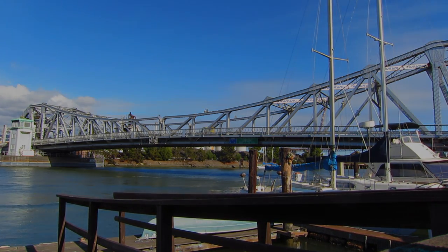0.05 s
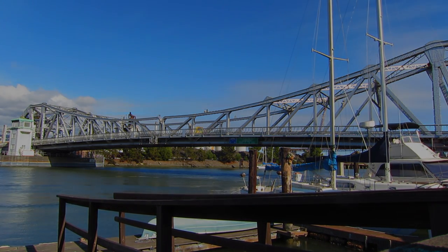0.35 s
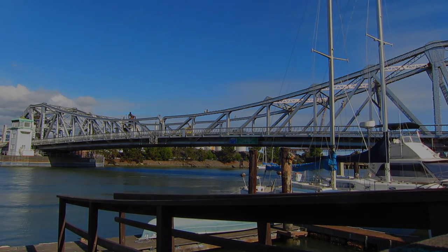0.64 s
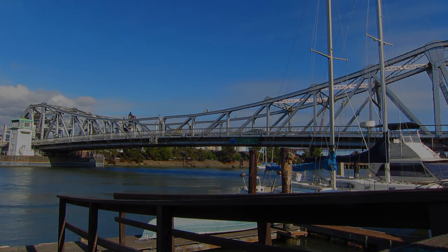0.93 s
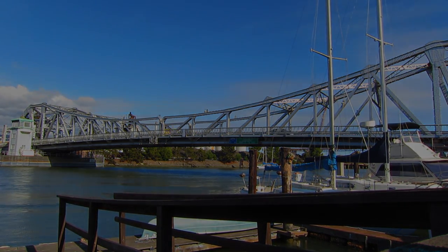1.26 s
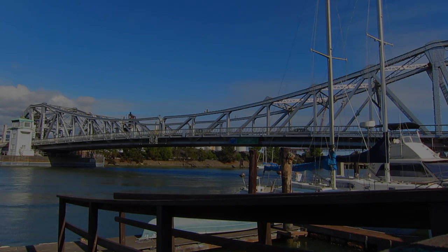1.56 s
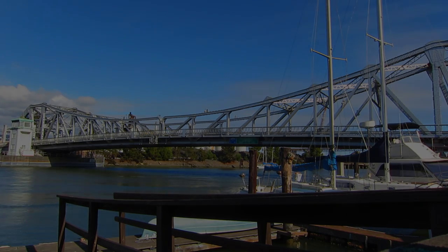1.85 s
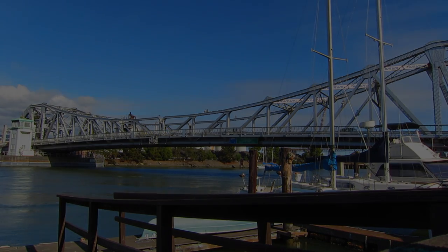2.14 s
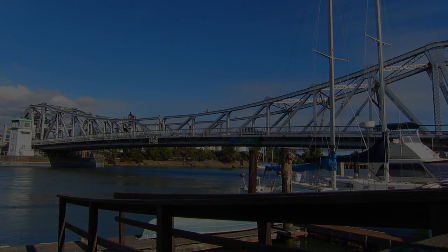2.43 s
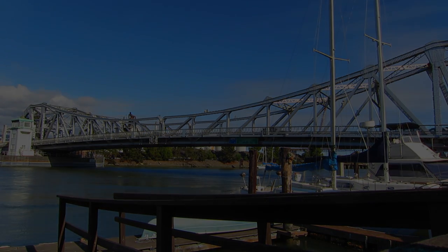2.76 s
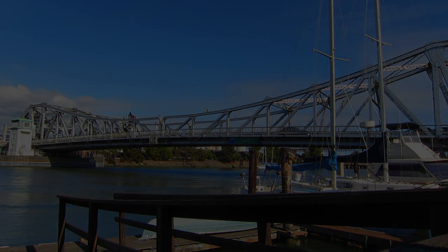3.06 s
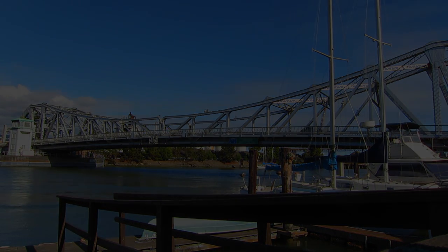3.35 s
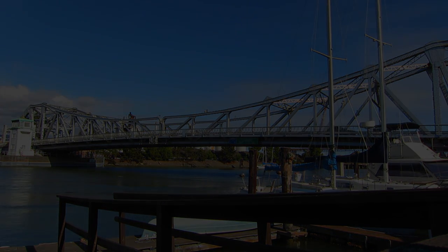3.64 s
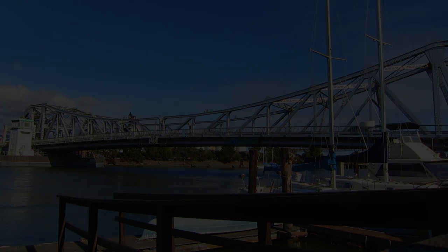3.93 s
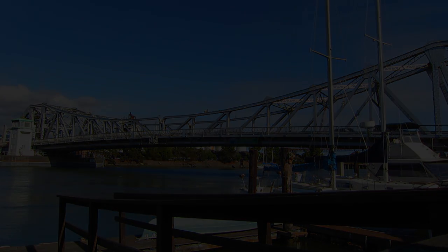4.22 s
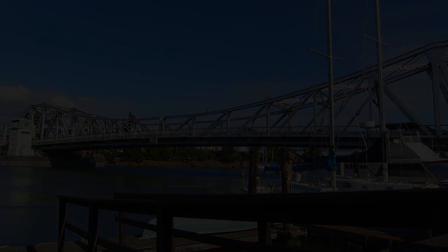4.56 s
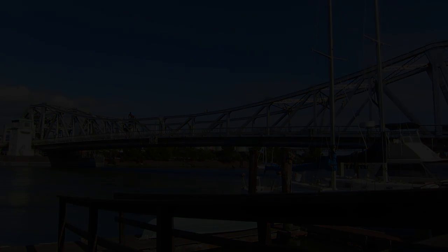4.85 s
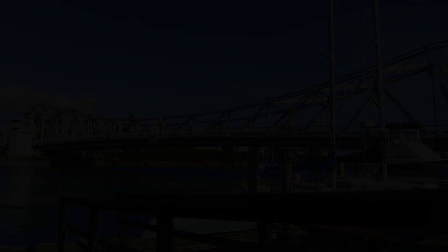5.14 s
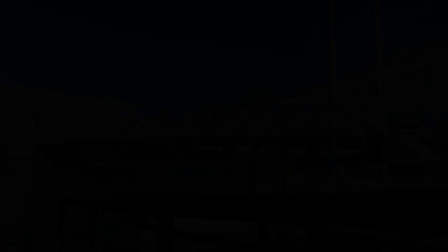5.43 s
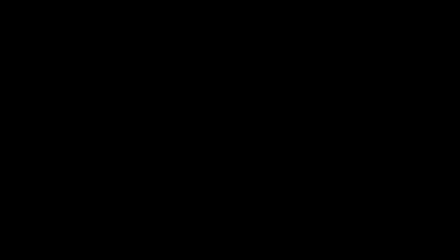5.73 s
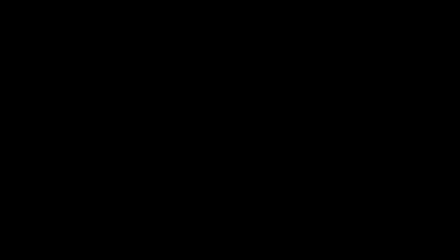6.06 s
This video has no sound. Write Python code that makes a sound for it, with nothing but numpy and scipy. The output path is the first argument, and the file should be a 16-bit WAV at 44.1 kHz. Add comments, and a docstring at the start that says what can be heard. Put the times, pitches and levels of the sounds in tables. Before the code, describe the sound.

Traffic hums and rumbles over a distant steel bridge, with wind buffeting, dull thuds and faint rattles, slowly fading.

```python
"""A marina, across the water from a steel drawbridge, heard through a small stereo camera.
Rolling tyres radiate broadband noise and drive the deck grating periodically, so that it hums.
Heavy vehicles excite the span's resonances in booms and thuds; light rattles and squeaks follow.
Turbulence buffets the microphone ports, hardest in the first second, and the camera's gain ducks
after the peaks. The whole scene slowly dies away."""
import sys
import numpy as np
from scipy import signal
from scipy.fft import rfft, irfft
from scipy.io import wavfile

SR = 44100
rng = np.random.default_rng(int(sys.argv[2]) if len(sys.argv) > 2 else 0)


def to_wav(s):
    """Save 16-bit WAV."""
    ch = np.atleast_2d(s).T  # columns
    pcm = np.round(np.clip(ch, -1, 1) * 32767)  # PCM
    wavfile.write(sys.argv[1], SR, pcm.astype(np.int16))


N = 268569
TIME_S = np.arange(N) / SR
BIN_HZ = np.arange(N // 2 + 1) * SR / N


def undb(db):
    """Amplitude ratio of a level in decibels."""
    return 10 ** (np.asarray(db) / 20)

def since(start_s):
    """Seconds elapsed since an onset, zero before it."""
    return np.maximum(TIME_S - start_s, 0)

def swell(centre_s, half_s):
    """Gaussian envelope: 1 at the centre, 1/e at half_s either side."""
    return np.exp(-np.minimum(((TIME_S - centre_s) / half_s) ** 2, 20))

def colour(points):
    """Spectral envelope: gain per bin, with levels interpolated over log frequency."""
    hz, db = np.transpose(points)
    return undb(np.interp(np.log(BIN_HZ + 1), np.log(hz), db))

def resonance(hz, half_width_hz):
    """Lorentzian resonance curve: gain per bin."""
    return 1 / (1 + ((BIN_HZ - hz) / half_width_hz) ** 2)

def noise(gain):
    """Spectral shaping of white noise, scaled to rms 1."""
    x = irfft(gain * rfft(rng.standard_normal(N)), N)
    return x / x.std()

def walk(rate_hz):
    """Random modulator: low-pass noise of spread 1."""
    return noise(resonance(0, rate_hz))

def pan(db):
    """Level panning: two gains for a left-minus-right difference."""
    return undb(np.array([[db], [-db]]) / 2)

# Side relative to mid for distant sound at two close ports: frequency_hz, level_db
SIDE_SPECTRUM = [(60, -10.5), (130, -20.5), (380, -11.5), (700, -9.5), (1300, -7.5), (2400, -4.5),
                 (4400, -3.5), (8000, -7), (15000, 2)]
def far_noise(gain, right_lag_s=.00003):
    """Partial coherence: distant noise from the left is alike at both ports in the bass, less so above."""
    mid, side = gain * rfft(rng.standard_normal((2, N)))
    side = side * colour(SIDE_SPECTRUM)
    lag = np.exp(-2j * np.pi * BIN_HZ * right_lag_s)
    return irfft(np.array([mid + side, (mid - side) * lag]), N) / irfft(mid, N).std()

def rolling(arrival_s, ebb_db_per_s, attack_s=0.1):
    """Linear rise and exponential decay as a vehicle rolls onto the span and away."""
    age = since(arrival_s)
    return np.minimum(age / attack_s, 1) * undb(-ebb_db_per_s * age)

# Heavy vehicles rolling onto the span: arrival_s, rumble_db, hiss_db, ebb_db_per_s
VEHICLES = [(-.04, -33.5, -51, 33.5), (1.53, -23, -42, 7.5), (3.95, -46.5, -58, 13)]
def load(boom=0, delay_s=0.11, half_s=0.14):
    """Excitation by moving loads: the vehicles' summed envelopes, with a boom after each arrival."""
    return sum(undb(db) * (rolling(s, ebb) + boom * swell(s + delay_s, half_s))
               for s, db, _, ebb in VEHICLES)

# Spectrum of the loaded span: frequency_hz, relative_db
RUMBLE_SPECTRUM = [(25, -31.5), (50, -18.5), (70, -6.5), (105, -0.5), (160, -1), (230, -7.5), (330, -8),
                   (460, -17), (700, -14), (1000, -18.5), (1500, -21.5), (2300, -37.5), (3500, -61),
                   (6000, -84)]
def heavy_vehicles(boom_hz=107, boom_db=-4.5, shudder_db=0.73):
    """Forced vibration: under a heavy vehicle the span booms, shudders and ebbs."""
    gain = colour(RUMBLE_SPECTRUM) * (1 + 0.43 * resonance(boom_hz, half_width_hz=7))
    return far_noise(gain) * load(boom=undb(boom_db)) * undb(shudder_db * walk(33)) * pan(-0.9)

def flow(ease_db_per_s=1.47, fade_db_per_s=3):
    """Exponential decay in two stages: the stream of traffic holds, eases, then dies away."""
    return undb(-29 - ease_db_per_s * since(1.1) - fade_db_per_s * since(3.56))

# Spectrum of distant tyres and engines: frequency_hz, relative_db
ROAR_SPECTRUM = [(25, -13), (50, -13.5), (68, 3.5), (110, -1), (180, -4.5), (230, -0.5), (310, 1),
                 (400, -2.5), (500, -2), (700, -6.5), (1000, -14), (1500, -22), (2000, -29.5),
                 (2600, -43.5), (5000, -70.5)]
def traffic(flutter_db=0.93):
    """Incoherent sources merge: tyres and engines make one roar, a little unsteady over the water."""
    return far_noise(colour(ROAR_SPECTRUM)) * flow() * undb(flutter_db * walk(8.8)) * pan(-1.6)

def grating_hum(pitch_hz=134, rise_hz_per_s=0.76, waver=0.0291, throb_db=3.0, noise_share=.3):
    """Periodic excitation: tyres drum over evenly spaced bars in a rough hum that rises and fades."""
    hz = (pitch_hz + rise_hz_per_s * TIME_S) * (1 + waver * walk(11))
    level_db = -30.5 - 1.8 * TIME_S - 9 * since(4.84)
    tone = np.sin(2 * np.pi * np.cumsum(hz) / SR) * undb(throb_db * walk(12))
    roughness = far_noise(resonance(pitch_hz, half_width_hz=9))
    hum = np.sqrt(2 * (1 - noise_share)) * tone + np.sqrt(noise_share) * roughness
    return hum * undb(level_db) * pan(-2.5)

# Resonances of the deck: pitch_hz, half_width_hz, relative_db
DECK_MODES = [(176.4, 12, 7.5), (330, 13, -5), (357, 6.1, -9), (423.6, 8, -9)]
# Swells of the drone as vehicles cross: centre_s, half_length_s, level_db
DRONE_SWELLS = [(2.053, 0.33, -31.5), (2.416, 0.04, -37), (3.154, .15, -47), (4.156, 0.067, -32),
                (4.47, 0.25, -37), (5.574, 0.064, -44)]
def deck_drone(flow_db=-8, load_db=-16.5, growth_db_per_s=1.55):
    """Modal resonance: traffic drives the deck at random, and it drones at its natural frequencies."""
    drone = far_noise(sum(undb(db) * resonance(hz, width) for hz, width, db in DECK_MODES))
    drive = np.hypot(undb(flow_db) * flow(), undb(load_db) * load()) * undb(growth_db_per_s * TIME_S)
    swells = sum(undb(db) * swell(s, half) for s, half, db in DRONE_SWELLS)
    return drone * np.hypot(drive, swells) * pan(-2.5)

# Spectrum of tyre hiss: frequency_hz, relative_db
HISS_SPECTRUM = [(1200, 2), (2300, -3.5), (3500, 2), (4700, -2), (5300, -5.5), (7000, -5.5), (8500, -12),
                 (10300, -19), (11800, -37), (13000, -34.5), (15500, -29.5)]
def tyre_hiss(flow_db=-26, dulling_db_per_s=2, floor_db=-72, grain_db=1):
    """Incoherent powers add: the hiss of the stream and of heavy vehicles sinks to a faint floor."""
    stream = flow() * undb(flow_db - dulling_db_per_s * since(2))
    vehicle_power = sum((undb(db) * rolling(s, ebb)) ** 2 for s, _, db, ebb in VEHICLES)
    envelope = np.sqrt(stream ** 2 + undb(floor_db) ** 2 + vehicle_power)
    return far_noise(colour(HISS_SPECTRUM)) * envelope * undb(grain_db * walk(230)) * pan(1.6)

# Pressure spectra of small and of large eddies: frequency_hz, relative_db
SMALL_EDDY_SPECTRUM = [(20, -15), (45, -6.5), (80, 7.5), (150, 9), (250, 2.5), (400, -9), (600, -23),
                       (1000, -32.5), (2500, -71.5)]
LARGE_EDDY_SPECTRUM = [(20, -16.5), (45, -3.5), (80, -0.5), (110, -1), (170, -7), (400, -39.5), (1500, -84)]
# Gusts on the microphone: centre_s, half_length_s, relative_db, large_eddy_share
GUSTS = [(0.02, 0.029, -27.5, 0.6), (0.122, 0.043, -20.5, 0.2), (0.268, 0.012, -13, 0.3),
         (0.344, 0.032, -15.5, 0.4), (0.468, 0.048, -15, 0.1), (0.66, 0.085, -27.5, .2),
         (0.955, 0.0067, -25, .15), (0.973, 0.027, -16, 0.3), (1.97, 0.033, -30.5, 0.9),
         (2.179, 0.047, -21.5, 0.3), (2.398, 0.048, -26.5, 0.4), (3.317, 0.059, -31.5, 0.94),
         (3.758, 0.032, -26, 0.3), (4.004, 0.083, -35.5, 0.6), (4.34, 0.023, -35.5, 1)]
def wind(easing_db_per_s=4, puff_db=3, swirl_db=1.5, crosstalk=.36, trim_db=-1.5):
    """Turbulent pressure at each port: gusts ride on an easing breeze; larger eddies rumble deeper."""
    breeze = undb(-31 - easing_db_per_s * TIME_S + puff_db * walk(17))
    small_power, large_power = breeze ** 2, 0
    for centre, half, db, large_share in GUSTS:
        power = undb(db) ** 2 * swell(centre, half)
        small_power += (1 - large_share) * power
        large_power += large_share * power
    ports = np.zeros((2, N))
    for port in ports:
        small = np.sqrt(small_power) * noise(colour(SMALL_EDDY_SPECTRUM))
        large = np.sqrt(large_power) * noise(colour(LARGE_EDDY_SPECTRUM))
        port[:] = (small + large) * undb(swirl_db * walk(50))
    # The stereo pair passes part of each port, inverted, to the other channel.
    return (ports - crosstalk * ports[::-1]) * undb(trim_db)

def whine(pitch_hz=15734, rms_db=-83, fade_db_per_s=4):
    """Electrical interference: a very faint pure tone from the camera, dying away with the rest."""
    tone = np.sqrt(2) * np.sin(2 * np.pi * pitch_hz * TIME_S)
    return tone * undb(rms_db - fade_db_per_s * since(2.5))

# Spectrum of the gritty treble: frequency_hz, relative_db
GRIT_SPECTRUM = [(3000, -23), (6500, 1), (9500, 7), (11500, -8), (12800, -1), (15500, -2)]
# Faint, brief swells of gritty high treble: centre_s, half_length_s, level_db
GRIT_SWELLS = [(0.046, .012, -63), (.16, 0.036, -64), (0.331, .002, -58), (0.345, .018, -60),
               (1.723, .008, -57), (2.335, 0.011, -69), (2.575, .025, -68), (4.655, .015, -72),
               (4.686, .025, -77)]
def treble_grit(grain_db=2.5):
    """Random amplitude modulation makes brief swells of treble noise sound gritty."""
    grit = np.array([noise(colour(GRIT_SPECTRUM)) for _ in range(2)]) * undb(grain_db * walk(300))
    return grit * sum(undb(db) * swell(s, half) for s, half, db in GRIT_SWELLS)

# Single eddies striking the ports: centre_s, peak_db, width_s, right_share
EDDIES = [(0.1186, -1, .0015, 0.55), (0.197, -3, 0.0013, 0.2), (.249, -1.5, 0.0013, 0.22),
          (0.3264, 2, 0.00076, 0.7), (.428, -11, .0013, .2), (.446, -11, .001, .2),
          (0.475, -7, 0.0013, 0.44), (.608, -10, .0009, .7), (.945, -7.5, 0.0005, 0.2),
          (.950, -3, .0011, .65), (0.955, -8, 0.00091, 0.15), (0.9835, -3.5, 0.0016, 0.72),
          (2.171, -13, .0012, .35), (2.215, -11, .0014, .8), (2.372, -11, .0016, .55)]
def eddy_thumps(rebound=0.96):
    """Pressure transient: a spike between two shallow rebounds, inverted at the farther port."""
    out = 0
    for centre, db, width, right_share in EDDIES:
        offset = (TIME_S - centre) / width
        spike = (1 - rebound * offset ** 2) * np.exp(-offset ** 2 / 2)
        angle = right_share * np.pi / 2
        port_gains = np.sign(.5 - right_share) * np.array([[np.cos(angle)], [-np.sin(angle)]])
        out += undb(db) * spike * port_gains
    return out

# Spectra of a dull and of a bright rattle: frequency_hz, relative_db
DULL_SPECTRUM = [(1200, -20), (2300, 2.5), (3100, 7), (4200, 4), (4750, 9.5), (5400, -13), (7500, -8.5),
                 (10300, -43), (15500, -34)]
BRIGHT_SPECTRUM = [(2000, -9.5), (4000, 0), (6200, 4.5), (8000, -0.5), (9400, -7), (10800, -16.5),
                   (11800, -35), (13500, -24), (15500, -34)]
# One tick, then the rattles: start_s, relative_db, length_s, bright_share, left_minus_right_db
TICK_AND_RATTLES = [(0.329, -54, 0.0011, 0.3, -6), (1.036, -54, 0.045, 0.3, 1), (1.43, -55, 0.088, 0.3, 1),
                    (1.523, -45.5, 0.071, 0, 1), (1.64, -47, 0.065, 0.1, 1), (1.95, -48, .045, 0.4, 1),
                    (2.247, -51, 0.013, .5, 5), (2.333, -42.5, 0.021, 0.08, -4),
                    (2.547, -44, 0.082, 0.09, -3), (2.66, -51.5, 0.19, 0.44, 0),
                    (2.802, -49, 0.01, 0.96, -1), (2.982, -49, 0.029, 0.54, 2), (3.045, -53, 0.017, 0.7, 2),
                    (3.096, -45.5, 0.015, 0.75, 1), (3.19, -48, 0.019, 0.55, 2),
                    (3.233, -49, 0.065, 0.43, 1), (3.385, -53, 0.019, 0.2, 4),
                    (3.948, -55.5, 0.054, 0.07, 0), (4.17, -64, 0.11, 0.4, 3), (4.367, -63, 0.086, .3, 3)]
def tick_and_rattles(attack_share=0.13, spread=0.47, trim_db=-1):
    """Noise transients: short, dry rattles, and one sharp tick on the hardest wind thump."""
    dull = far_noise(colour(DULL_SPECTRUM))
    bright_mid, bright_side = (noise(colour(BRIGHT_SPECTRUM)) for _ in range(2))
    bright = bright_mid + spread * bright_side * np.array([[1], [-1]])
    out = 0
    for start, db, length, bright_share, pan_db in TICK_AND_RATTLES:
        progress = since(start) / length
        envelope = (1 - np.exp(-progress / attack_share)) * np.exp(-progress ** 2 / 2)
        blend = np.sqrt(1 - bright_share) * dull + np.sqrt(bright_share) * bright
        out += undb(db + trim_db) * envelope * blend * pan(pan_db)
    return out

# Thin squeaks among the rattles: centre_s, pitch_hz, level_db, half_length_s
SQUEAKS = [(.37, 12750, -69, .016), (.72, 8450, -72, .17), (1.481, 10100, -68, .01),
           (1.724, 14200, -62.5, .009), (2.343, 4900, -50, 0.017), (2.59, 3350, -55, .035),
           (2.59, 4770, -59, .03), (3.397, 9300, -63, .007), (4.69, 6550, -72, .025)]
def squeaks(width_share=0.042):
    """Narrow-band resonance: noise confined near one pitch is heard as a brief, rough ring."""
    return sum(undb(db) * swell(s, half) * noise(resonance(hz, width_share * hz))
               for s, hz, db, half in SQUEAKS)

# Spectrum of tyre rush: frequency_hz, relative_db
RUSH_SPECTRUM = [(200, -22), (500, 13.5), (1500, -5), (2200, -12), (4000, -22), (9000, -50)]
# Swells of tyre rush: centre_s, half_length_s, level_db
RUSHES = [(1.57, 0.027, -31), (1.698, 0.037, -32), (1.896, 0.028, -31)]
def tyre_rushes(rough_db=3.5):
    """Rolling noise: the heaviest vehicle's tyres rush in rough, mid-frequency swells."""
    swells = sum(undb(db) * swell(s, half) for s, half, db in RUSHES)
    return far_noise(colour(RUSH_SPECTRUM)) * swells * undb(rough_db * walk(60)) * pan(0.5)

# Modes of the struck deck: pitch_hz, relative_db, decay_s
THUD_MODES = [(108.2, -4, 0.025), (173.5, 0, 0.0083), (315, -8.5, 0.017), (637, -6, 0.0094)]
# Wheels striking the deck: start_s, strength_db
THUDS = [(1.599, -14.5), (1.636, -12), (1.668, -15), (1.792, -17), (1.88, -10.5), (1.97, -13), (2.102, -18),
         (2.411, -16)]
def wheel_thuds(detune=0.058, attack_s=0.0086):
    """Damped free vibration: a wheel knocks the deck, and each spot rings at slightly different pitches."""
    out = 0
    for start, db in THUDS:
        age = since(start)
        tunings = 1 + detune * rng.standard_normal(len(THUD_MODES))
        ring = 0
        for (hz, mode_db, decay), tuning in zip(THUD_MODES, tunings):
            damping = np.exp(-np.minimum(age / decay, 20))
            ring += undb(mode_db) * np.sin(2 * np.pi * hz * tuning * age) * damping
        onset = 1 - np.exp(-np.minimum((age / attack_s) ** 2, 20))
        out += undb(db) * ring * onset
    return out * pan(-3)

def gain_control(x, threshold_db=-4.8, cut_share=.85, attack_s=.016, recover_db_per_s=16):
    """Compression: peaks over the threshold lower the gain a moment later; it recovers steadily."""
    peak_db = 20 * np.log10(np.abs(x).max(axis=0) + 1e-9)
    excess_db = np.maximum(peak_db - threshold_db, 0)
    recovery_db = recover_db_per_s * TIME_S
    cut_db = np.maximum.accumulate(cut_share * excess_db + recovery_db) - recovery_db
    pole = np.exp(-1 / (attack_s * SR))
    return x * undb(-signal.lfilter([1 - pole], [1, -pole], cut_db))

def scene():
    """Superposition: the distant bridge, wind and small sounds, and the heaviest wheels."""
    bridge = heavy_vehicles() + traffic() + grating_hum() + deck_drone() + tyre_hiss()
    foreground = wind() + whine() + treble_grit() + eddy_thumps() + tick_and_rattles() + squeaks()
    return bridge + foreground + tyre_rushes() + wheel_thuds()

def record(dry, cutoff_hz=15850):
    """Compression and band limiting: the camera ducks after the hardest thumps and cuts the top."""
    low_pass = signal.ellip(8, .2, 70, cutoff_hz, fs=SR, output="sos")
    return signal.sosfilt(low_pass, gain_control(dry))


dry = scene()
out = record(dry)
to_wav(out)
```